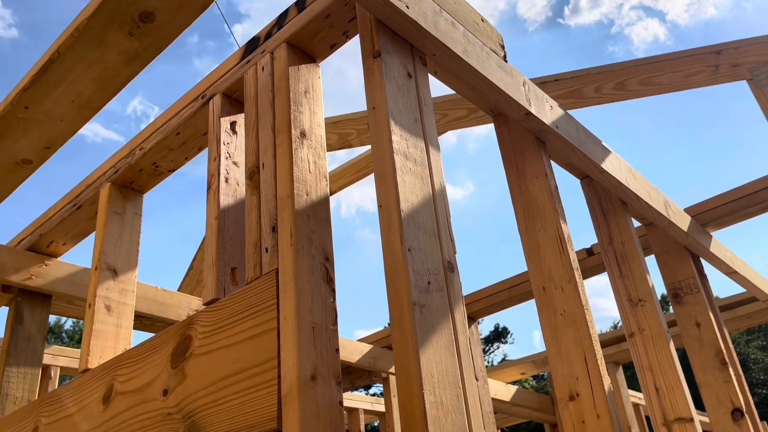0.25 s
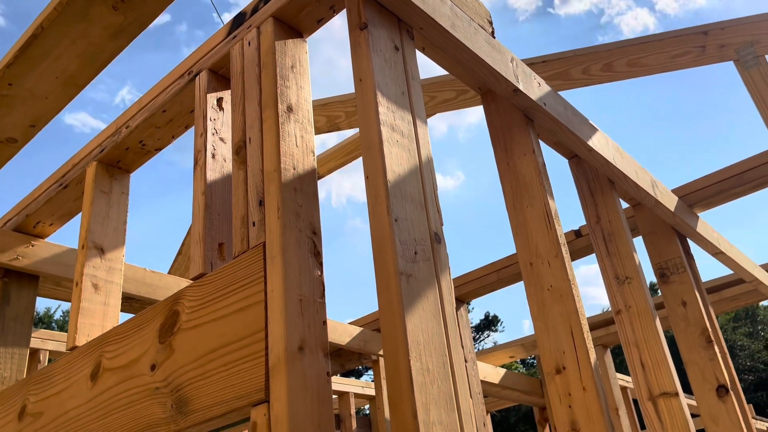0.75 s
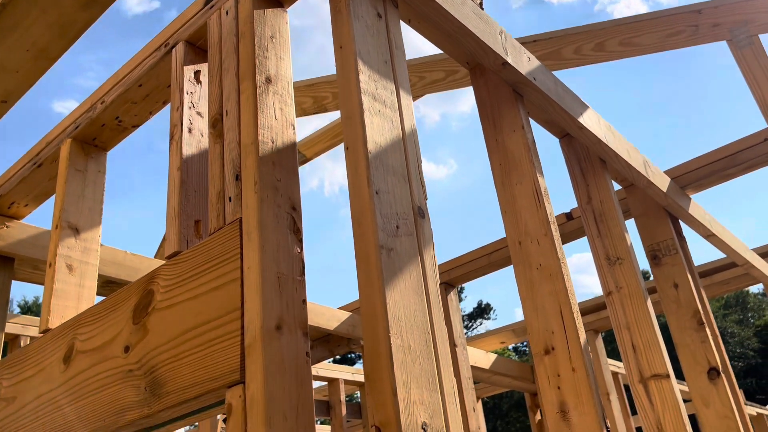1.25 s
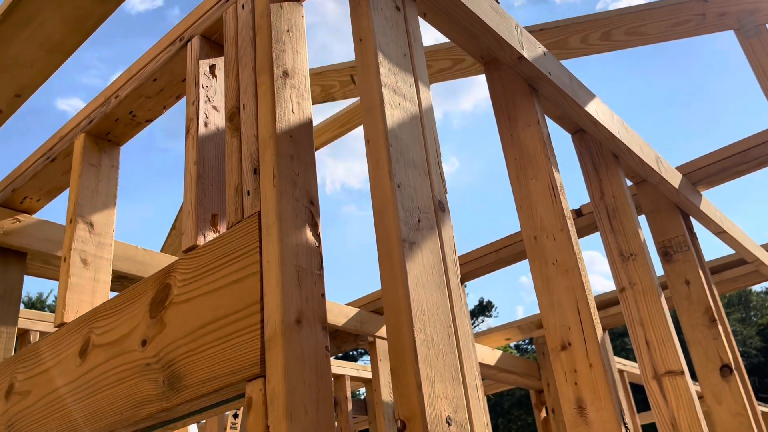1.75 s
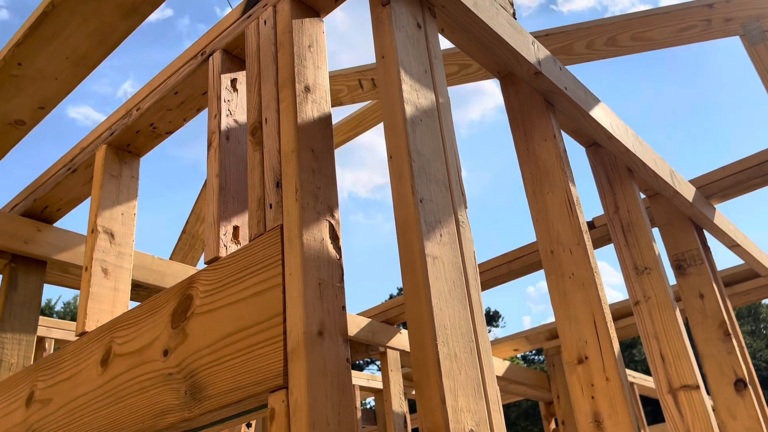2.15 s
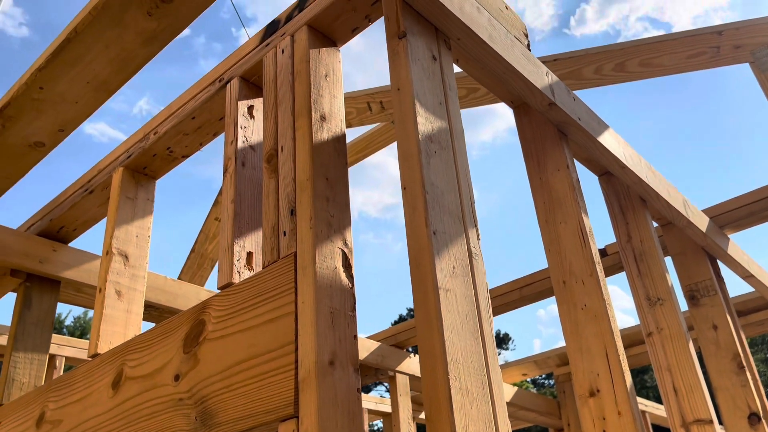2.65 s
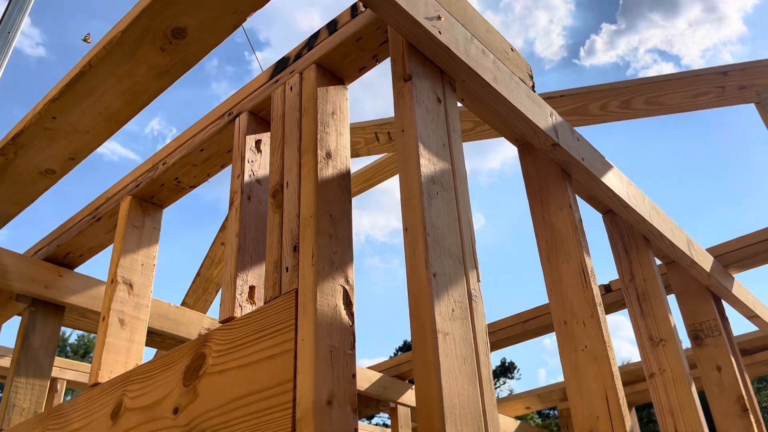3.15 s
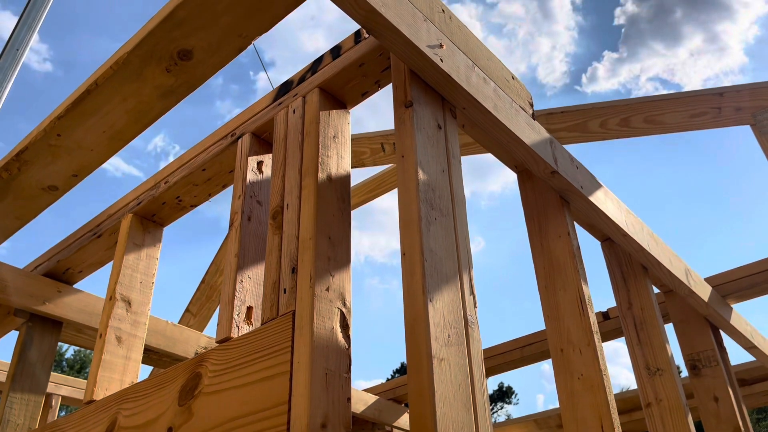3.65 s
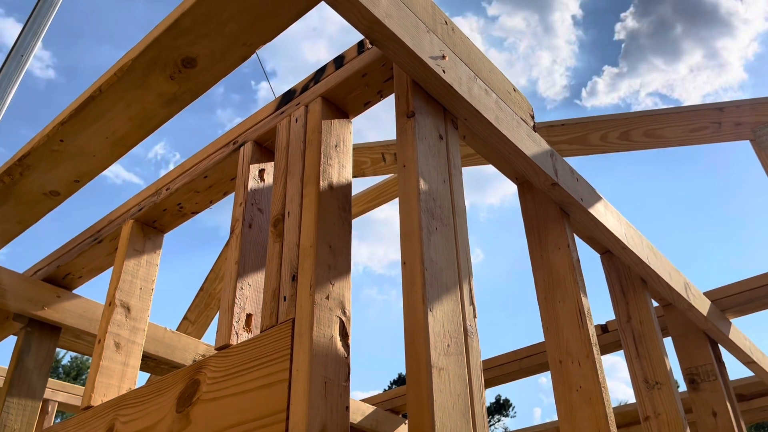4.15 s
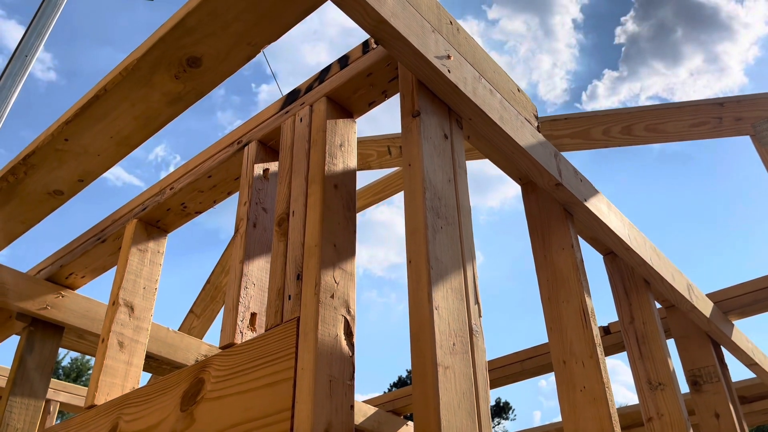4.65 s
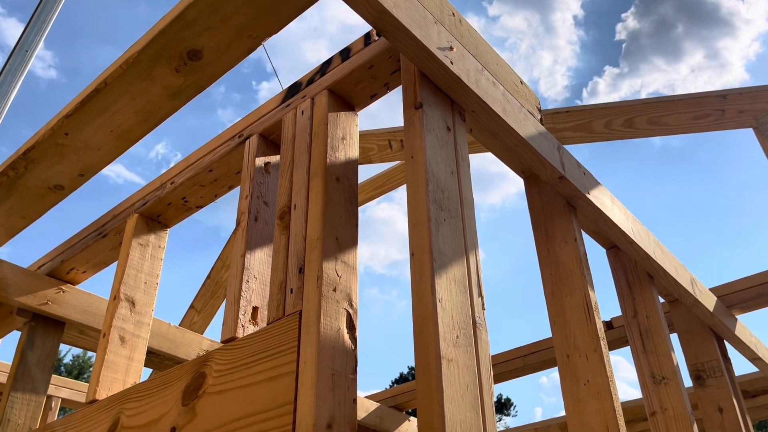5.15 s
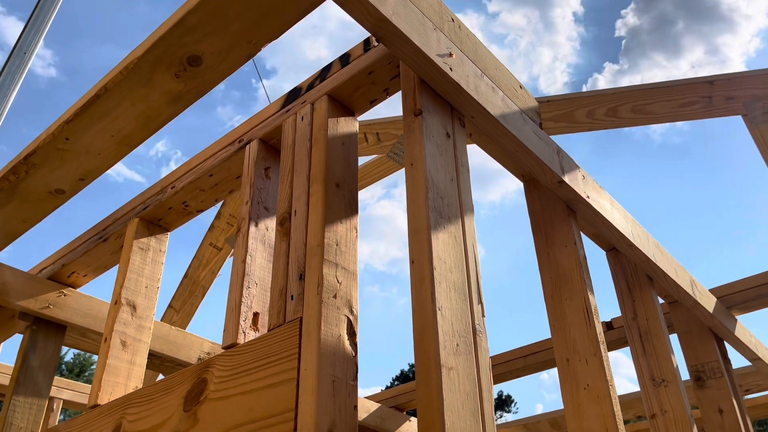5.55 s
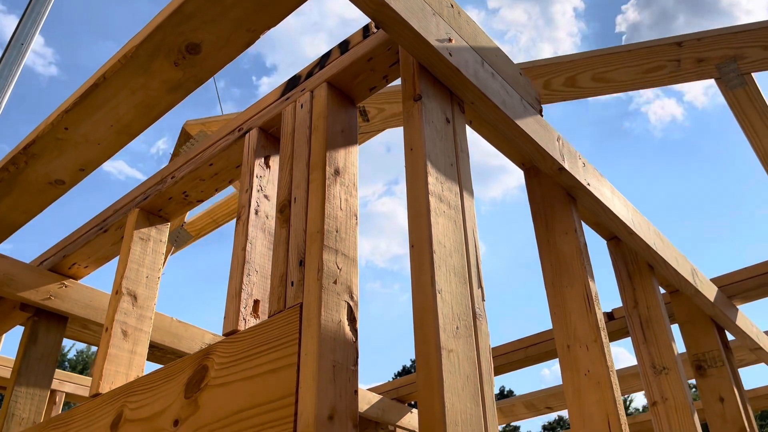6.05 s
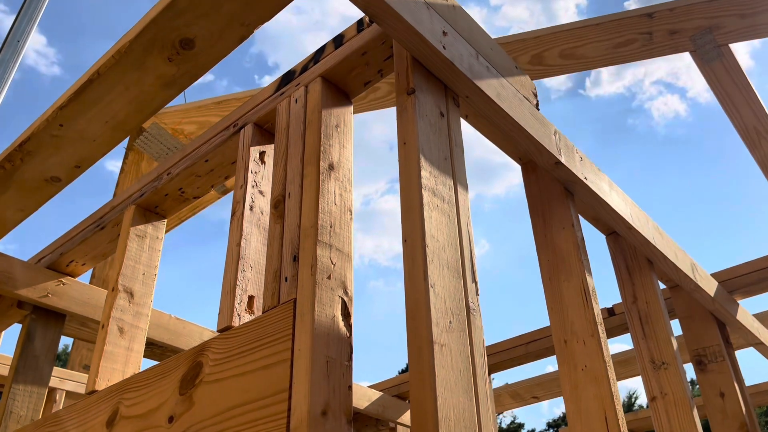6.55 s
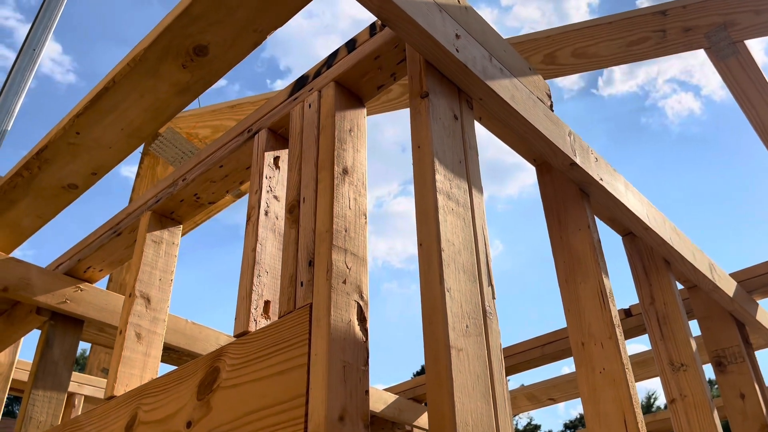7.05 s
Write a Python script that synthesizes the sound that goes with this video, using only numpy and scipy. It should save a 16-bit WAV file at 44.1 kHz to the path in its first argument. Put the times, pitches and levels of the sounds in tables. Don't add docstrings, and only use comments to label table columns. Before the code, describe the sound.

At an outdoor building site, an electric winch already running cuts out at once, then hauls in five more separate bursts. Each has a buzzy mid-pitched whine over coarse gear grinding; the gears coast down quickly and the steel mount rings on. Low frame thrums, wind rumble, faint insect hiss and scattered timber knocks fill the gaps. Close stereo microphone pair.

```python
import sys
import numpy as np
from scipy import signal
from scipy.fft import rfft, irfft
from scipy.io import wavfile
from scipy.ndimage import uniform_filter1d

SR = 44100
rng = np.random.default_rng(int(sys.argv[2]) if len(sys.argv) > 2 else 0)


def elevation(decibels):
    levels = np.asarray(decibels, float)
    return 10 ** (levels / 20)


def persist_wave(psi):
    counts = np.round(np.clip(psi, -1, 1) * 32767).astype(np.int16)
    wavfile.write(sys.argv[1], SR, np.atleast_2d(counts).T)


N = 321930
TIME = np.arange(N) / SR
HZ = np.fft.rfftfreq(N, 1 / SR) + 1e-3

# (on [s], off [s], armature beat at full speed [Hz], gear grind level [dB],
# swell under growing load [dB/s])
RUNS = [
    (-.5, 0.21, 450.8, -25.5, 2.5),
    (1.471, 2.237, 442.9, -19.5, -1.04),
    (3.135, 3.608, 442.6, -19.5, -5.5),
    (4.331, 4.692, 437.4, -24.5, 8),
    (5.284, 5.465, 438.7, -17, -13.5),
    (7.032, 7.4, 451, -19, 0.5),
]
# (time [s], level [dB])
GUSTS = [(0.0, -45), (0.12, -70), (0.3, -58.5), (1.38, -76), (1.65, -67), (1.99, -85), (2.13, -48),
         (2.38, -60), (2.52, -52), (2.64, -65.5), (3.7, -70.5), (3.78, -53), (4.33, -68), (4.43, -61),
         (5.14, -67), (5.22, -60), (5.33, -43.5), (7.3, -57)]
# (frequency [Hz], share common to both [0-1])
ALIKE = [(100, .97), (400, .55), (800, .8), (1300, .55), (1800, .75), (2250, .35), (2700, .7), (3100, .45),
         (4300, .68), (5300, .45), (6100, .65), (7000, .45), (7500, .85), (8600, .99)]
# (frequency [Hz], phase by which the left leads [rad])
LEAD = [(60, 0), (350, 1.2), (700, .8), (1200, 1.2), (1550, 3.3), (2100, 4.2), (2500, 6.7), (4500, 7),
        (5300, 7.3), (6800, 6.2), (7300, 7.6), (8600, 6.3), (9800, 3.4)]


def rms_one(x):
    return x / np.sqrt(np.mean(x ** 2) + 1e-20)


def in_time(rows):
    s, *columns = np.transpose(rows)
    return [np.interp(TIME, s, column) for column in columns]


def at_hz(points):
    hz, value = np.transpose(points)
    return np.interp(np.log(HZ), np.log(hz + 1), value)


def drift(rate, db=None):
    r = np.exp(-80 * np.pi * rate / SR)
    noise = rng.standard_normal(N // 40 + 2002)
    slow = rms_one(signal.lfilter([1], [1, -2 * r, r * r], noise)[2000:])
    if db is not None:
        slow = elevation(db * slow)
    return np.interp(np.arange(N) / 40, np.arange(len(slow)), slow)


def resonance(x, hz, width_hz):
    r = np.exp(-np.pi * width_hz / SR)
    poles = [1, -2 * r * np.cos(2 * np.pi * hz / SR), r * r]
    return signal.lfilter([(1 - r * r) / 2, 0, (r * r - 1) / 2], poles, x)


def twice_resonant(x, hz, width_hz):
    return resonance(resonance(x, hz, width_hz), hz, width_hz)


def coloured(spectrum):
    return rms_one(irfft(rfft(rng.standard_normal(N)) * elevation(at_hz(spectrum)), N))


def ports(first, second, alike, lead, tilt_db):
    alike = np.clip(alike, 0, 1)
    common = rfft(first) * np.sqrt((1 + alike) / 2)
    apart = rfft(second) * np.sqrt((1 - alike) / 2)
    turn = np.exp(.5j * lead) * elevation(tilt_db / 2)
    return irfft(np.array([(common + apart) * turn, (common - apart) / turn]), N)


def motor_state():
    start_hz, spin_up_s, sag_hz_per_s = 286.4, .062, 8
    stop_hz, spin_down_s = 302.7, .09
    attack_s, bite = 0.035, .1
    latest = np.maximum(np.searchsorted([row[0] for row in RUNS], TIME) - 1, 0)
    on, off, full_hz, db, swell = np.transpose(RUNS)[:, latest]
    driven = np.minimum(TIME, off) - on
    coast = np.maximum(TIME - off, 0)
    hz = full_hz - sag_hz_per_s * driven - (full_hz - start_hz) * np.exp(-driven / spin_up_s)
    hz = stop_hz + (hz - stop_hz) * np.exp(-coast / spin_down_s)
    db = db + swell * driven + 20 * np.log10(1 - (1 - bite) * np.exp(-driven / attack_s))
    return hz, db, coast


def motor_path(hz, whine):
    # (multiple of the beat, level [dB])
    whine_orders = [(1, -3.5), (2, 3.5), (3, 4), (4, 8), (5, 4), (6, 3.5), (7, 2), (8, 1), (9, -1.5),
                    (10, -4), (11, -0.5), (12, -1.5), (13, -4), (14, -3.5), (15, -15), (16, -3.5), (17, -3),
                    (18, -7.5), (19, -3), (20, -13.5), (21, -1), (22, -2.5)]
    # (frequency [Hz], level [dB per Hz])
    grind_spectrum = [(150, -48.5), (260, -15), (667, -5), (800, -1), (917, -5), (1260, 1.5), (1630, 0),
                      (1900, 4.5), (2180, -5), (2820, -2.5), (3140, -3), (5760, -12), (8680, -10.5),
                      (9800, -12.5), (12700, -60.5), (21600, -120)]
    # (frequency [Hz], width [Hz], boost [dB])
    housing = [(452, 100, 6), (863, 78, 4), (2793, 160, 4.5), (9800, 3900, 9.5)]
    phase = 2 * np.pi * np.cumsum(hz * (1 + 0.002123 * drift(25))) / SR
    spin_up = elevation(-2.5 * np.clip((430 - hz) / 130, 0, 1))
    orders = np.zeros(N)
    for k, db in whine_orders:
        firmness = spin_up ** (abs(k - 2) - 1.5)
        tone = np.sin(k * phase + 0.85 * drift(9.1) + k * k)
        orders += elevation(db) * drift(28, db=5.0) * firmness * tone
    grind = coloured(grind_spectrum) * (1 + 0.12 * np.sin(phase)) * drift(37, db=1.0)
    both = (grind + whine * rms_one(orders)) / np.sqrt(1 + whine ** 2)
    boost = sum((elevation(db) - 1) * resonance(both, peak_hz, width_hz) for peak_hz, width_hz, db in housing)
    return rms_one(both + boost)


def drum_boom(db, coast):
    boom = twice_resonant(rng.standard_normal(N), 174.2, 11)
    return elevation(db - 35.5 - 74 * coast) * rms_one(boom)


def mount():
    # (frequency [Hz], ..)
    mount_hz = [
        [1211, 1225.5, 1270],
        [1900, 1951],
        [1976, 2003, 2078],
        [2266, 2326, 2455, 2514, 2600, 3990],
    ]
    # (t60 [s], level within the part [dB])
    mount_modes = [
        [(2.6, 0), (2.2, -1), (1.0, -1)],
        [(2.2, 1), (1.6, -1)],
        [(2.0, -3), (1.8, 2), (2.0, 1)],
        [(1.6, -2), (2.2, 2), (1.3, 0), (1.3, -1), (1.2, -4), (1.4, -13)],
    ]
    # (level of part 1 [dB], part 2 [dB], part 3 [dB], part 4 [dB])
    left_ringing = [
        (-67.5, -65, -60, -72.5),
        (-69.5, -59.5, -63, -70.5),
        (-72.5, -60.5, -55, -68.5),
        (-61, -53, -62, -72),
        (-58, -72.5, -52, -66),
    ]
    rings = np.zeros(N)
    for part_hz, modes, left_db in zip(mount_hz, mount_modes, np.transpose(left_ringing)):
        for hz, (t60, mode_db) in zip(part_hz, modes):
            level = np.zeros(N)
            for (on, off, *rest), db in zip(RUNS, left_db):
                since_s = np.maximum(TIME, off + .24) - off - .4
                build_up = np.clip((TIME - on) / (off - on), 0, 1)
                level += elevation(db - 60 * since_s / t60) * build_up
            waver = drift(3, db=1.0)
            tone = np.sin(2 * np.pi * hz * TIME + .2 * drift(3))
            rings += np.sqrt(2) * elevation(mode_db) * level * waver * tone
    return rings


def winch():
    # (frequency [Hz], left over right [dB])
    tilt = [(100, 1), (600, 3.5), (1600, -1.5), (2700, 3), (4000, 2.5), (5600, 7), (6200, 4), (7000, 7),
            (7800, 2), (8600, 0)]
    hz, db, coast = motor_state()
    grind = elevation(db - 5 * (10 * coast) ** 2.246)
    whine = elevation(-2.5 - 214.5 * np.maximum(coast - .04, 0))
    paths = np.array([motor_path(hz, whine) for path in range(2)])
    dull = signal.butter(2, 2600, fs=SR, output="sos")
    echo = signal.sosfilt(dull, paths[::-1])
    echo_gain = elevation(db + 3 - 119 * coast) * np.minimum(10 * coast, 1)
    paths = grind * paths + echo_gain * echo
    first = paths[0] + drum_boom(db, coast) + mount()
    return ports(first, paths[1], at_hz(ALIKE), at_hz(LEAD), at_hz(tilt))


def frame_thrum():
    # (from [s], to [s], thrum pitch [Hz], level [dB], t60 [s])
    pushes = [(-.2, .36, 84.5, -36, 1.03), (1.587, 1.76, 77.5, -42, 0.99), (1.923, 2.136, 82, -48, 0.37),
              (2.16, 2.624, 75.5, -48.5, 1.1), (2.864, 2.98, 66.5, -53, .6), (3.268, 3.446, 77.3, -43, .4),
              (3.536, 3.814, 83.5, -41.5, 0.78), (4.418, 4.61, 77.5, -43.5, 0.52),
              (4.62, 4.76, 80.2, -43, 2.4), (5.023, 5.203, 76, -45.5, 0.34), (5.22, 5.297, 71, -35, 0.23),
              (5.364, 5.442, 85, -34, 0.34), (5.582, 5.659, 79, -32, 0.19), (5.756, 5.833, 58.5, -35, 1.2),
              (5.954, 6.298, 62, -63, 0.16), (6.403, 6.46, 90, -36.5, 0.27),
              (6.533, 6.646, 90, -42.5, 0.65), (6.666, 6.9, 61, -48, 0.75), (7.13, 7.303, 73, -43, .5)]
    wander = .5 * drift(2)
    thrum = np.zeros(N)
    for start, end, hz, db, t60 in pushes:
        rise = np.clip((TIME - start) / 0.065, 0, 1)
        fall = elevation(db - 60 * np.maximum(TIME - end, 0) / t60)
        thrum += fall * rise * np.sin(2 * np.pi * hz * TIME + wander)
    return np.sqrt(2) * thrum * elevation(.5 * drift(6.0)) * elevation([[.4], [-.4]])


def wind():
    # (frequency [Hz], level [dB per Hz])
    wind_spectrum = [(12, -38.5), (20, -24), (49, 5), (71, 3), (158, -14), (242, -22.5), (400, -35.5),
                     (520, -79), (880, -120)]
    wind_db, = in_time(GUSTS)
    strength = elevation(wind_db + 7.5) + elevation(-70)
    rumble = [strength * elevation(2.9 * drift(6)) * coloured(wind_spectrum) for path in range(2)]
    return ports(*rumble, 0.97, 0, .9)


def site():
    # (frequency [Hz], level [dB per Hz])
    murmur_spectrum = [(59, -34.5), (100, -12), (362, -17.5), (583, -22.5), (1130, -24.5), (1230, -25.5),
                       (1600, -21.5), (2080, -62), (3520, -120)]
    # (frequency [Hz], level [dB per Hz])
    rustle_spectrum = [(760, -44), (1300, -15), (2020, -8.5), (2650, -15.5), (3200, -19), (4470, -13),
                       (6000, -19.5), (7230, -22.5), (8780, -15.5), (9800, -10.5), (12700, -63),
                       (21600, -120)]
    # (time [s], level [dB])
    stir = [(0, -69), (.74, -76.5), (1.2, -79), (1.45, -74.5), (2.7, -79), (3.1, -76.5), (4.0, -74),
            (4.3, -74.5), (5.18, -70.5), (5.27, -56), (5.75, -63), (6.54, -66), (6.6, -75), (6.71, -75),
            (6.87, -72.5), (7.02, -73), (7.3, -89)]
    rustle_db, = in_time(stir)
    wind_db = uniform_filter1d(in_time(GUSTS)[0], size=SR // 4)
    hz, motor_db, coast = motor_state()
    murmur = elevation(-70 + (rustle_db + 75.5) + 0.26 * (wind_db + 60.5))
    murmur = murmur + elevation(motor_db - 1.5 - 158.5 * np.maximum(coast, .2))
    paths = []
    for path in range(2):
        low = murmur * elevation(4.0 + 2.0 * drift(23.0)) * coloured(murmur_spectrum)
        bright = elevation(rustle_db + 7.0 + 1.0 * drift(6.8)) * coloured(rustle_spectrum)
        paths.append(low + bright)
    return np.array(paths)


def insects():
    # (from [s], to [s], final level [dB], growth [dB/s])
    chorus = [
        (.3, 0.872, -69, 0),
        (2.707, 3.14, -65, 25.5),
        (4.9, 7.306, -81, -1),
    ]
    level = elevation(-94.5)
    for start, end, db, growth in chorus:
        fade = 61 * np.maximum(TIME - end, 0)
        swell = elevation(db - growth * np.maximum(end - TIME, 0) - fade)
        level = level + swell * np.clip((TIME - start) / 0.13, 0, 1)
    bands = [rms_one(twice_resonant(rng.standard_normal(N), 6260, 890)) for path in range(2)]
    return level * elevation(2.5) * np.array(bands)


def open_air():
    return ports(*(site() + insects()), 0.86 * at_hz(ALIKE), at_hz(LEAD), 0.87)


def timbers():
    # (time [s], wood level [dB], pitch [Hz], hiss level [dB], t60 [s])
    blows = [(0.996, -87, 1110, -54.5, 0.29), (1.384, -59, 1390, -52.5, 1), (2.77, -61.5, 900, -87, 0.13),
             (3.839, -41, 1000, -33, 0.21), (4.041, -64, 900, -85, 0.2), (4.089, -65, 895, -85, .15),
             (4.24, -96, 1200, -58, .089), (5.02, -51, 1300, -80, 0.18), (5.19, -49.5, 1180, -50.5, 0.34),
             (5.81, -42, 740, -76, 0.14), (5.978, -47, 1200, -64, 0.13), (6.286, -70, 1500, -54, .04),
             (6.315, -47.5, 1270, -80, .3), (6.334, -40.5, 1000, -59, .2), (6.475, -68, 900, -50, 0.12),
             (6.729, -51.5, 1860, -45, 0.27), (6.889, -50, 1430, -66, 0.21)]
    # (time [s], level [dB], pitch [Hz], t60 [s])
    ticks = [(1.395, -57.5, 8580, 0.083), (4.138, -45, 1620, 0.062), (5.012, -43, 1750, 0.066),
             (6.287, -41, 8100, 0.036), (6.893, -43, 1750, 0.18), (6.893, -53, 1900, .08),
             (5.81, -42, 890, 0.16), (6.34, -46.5, 1090, 0.24), (6.385, -44, 700, .1),
             (4.09, -58, 780, 0.13), (4.045, -53, 1100, 0.13)]
    paths = np.zeros((2, N))
    t = TIME[:SR // 4]
    bright = signal.butter(2, 2600, "high", fs=SR, output="sos")
    for s, db, hz, hiss_db, t60 in blows:
        burst = rng.standard_normal((2, len(t)))
        rise = np.minimum(t / t60 / 0.021, 1)
        shape = rise * elevation(-60 * t / t60)
        wood = rms_one(twice_resonant(burst, hz, 1.1 * hz))
        scuff = rms_one(signal.sosfilt(bright, burst))
        paths[:, round(s * SR):][:, :len(t)] += shape * (elevation(db) * wood + elevation(hiss_db) * scuff)
    for s, db, hz, t60 in ticks:
        paths[0, round(s * SR):][:len(t)] += elevation(db - 60 * t / t60) * np.sin(2 * np.pi * hz * t)
    return ports(*paths, at_hz(ALIKE), at_hz(LEAD), 2.6)


def patchy_top(x):
    # (frequency [Hz], centre level under 8-9.7 kHz [dB],
    # odds of the centre being kept [spreads], side level [dB])
    top_bands = [(9640, 2.5, -10, -5), (9717, -6, -0.13, -4.5), (10820, -19.5, -2, -1.5),
                 (10700, -14.5, 2, 5), (11110, -5, 0.17, -27), (11900, -21, 1.5, -42.5),
                 (11950, -12.5, -1, -62.5), (13090, -23, -2, -59)]
    hz, s, frames = signal.stft(x, SR, "cosine", 2048, 1024)
    below = (hz > 8000) & (hz < 9700)
    level = np.sqrt(np.mean(np.abs(frames[:, below]) ** 2, axis=(0, 1))) + 1e-9
    top = hz > 9750
    top_hz, bins = hz[top], top.sum()
    shape = (2, bins, len(s))
    noise = rng.standard_normal(shape) + 1j * rng.standard_normal(shape)
    at, db, odds, side_db = np.transpose(top_bands)
    own = uniform_filter1d(rng.standard_normal((bins // 8 + 1, len(s))), size=2)
    own = own.repeat(8, axis=0)[:bins]
    attack = np.clip(np.gradient(np.log(level)), -1, 3)
    mood = np.resize(drift(10)[::1024], len(s)) + 3.0 * attack
    kept = np.interp(top_hz, at, odds, right=-9)[:, None] + .8 * mood + 1.0 * own > 0
    centre = noise[0] * elevation(np.interp(top_hz, at, db))[:, None] * kept
    side = noise[1] * elevation(np.interp(top_hz, at, side_db))[:, None]
    side = side * (top_hz[:, None] < 11200 + 250 * mood)
    hole = (hz > 8400) & (hz < 8850)
    frames[:, hole] = np.where(mood < 1.0, frames[:, hole].mean(axis=0), frames[:, hole])
    frames[:, top] = level * np.array([centre + side, centre - side])
    return signal.istft(frames, SR, "cosine", 2048, 1024)[1][:, :N]


def scene():
    return winch() + frame_thrum() + wind() + open_air() + timbers()


def low_pass(x):
    return signal.sosfilt(signal.butter(12, 13110, fs=SR, output="sos"), x)


def record(dry):
    mix = patchy_top(dry)
    return low_pass(mix)


dry = scene()
out = record(dry)
persist_wave(out)
```